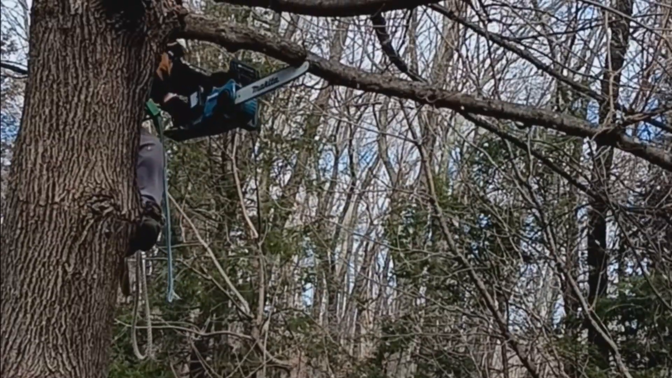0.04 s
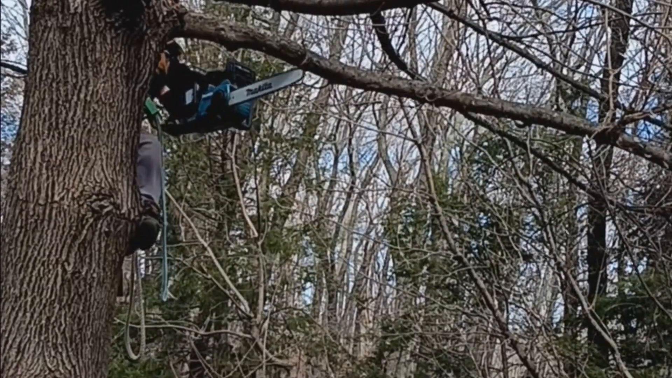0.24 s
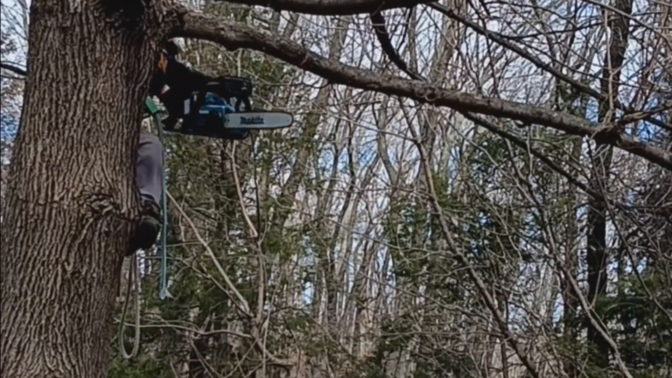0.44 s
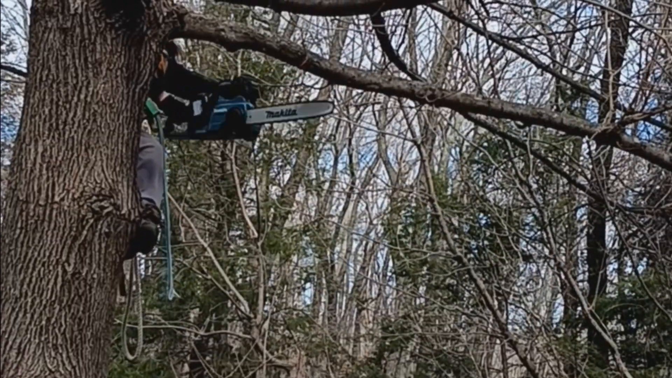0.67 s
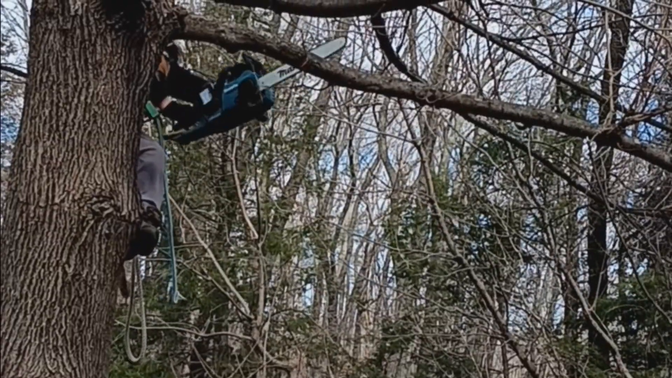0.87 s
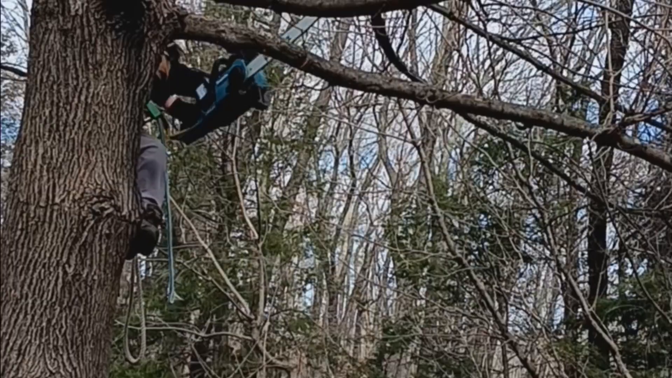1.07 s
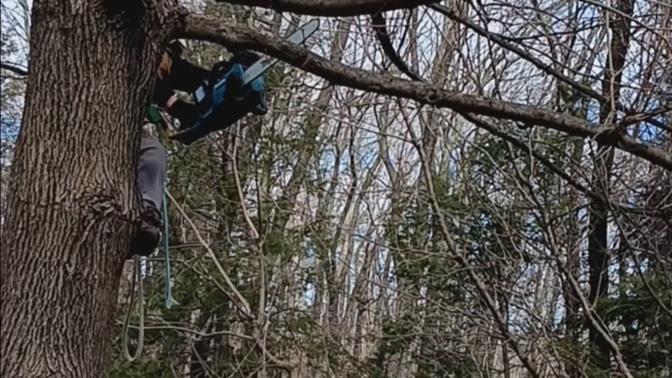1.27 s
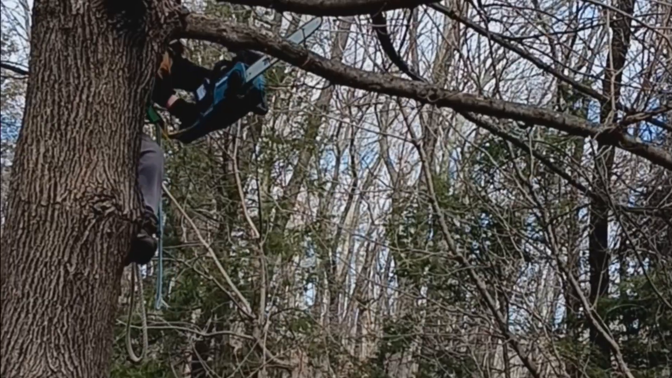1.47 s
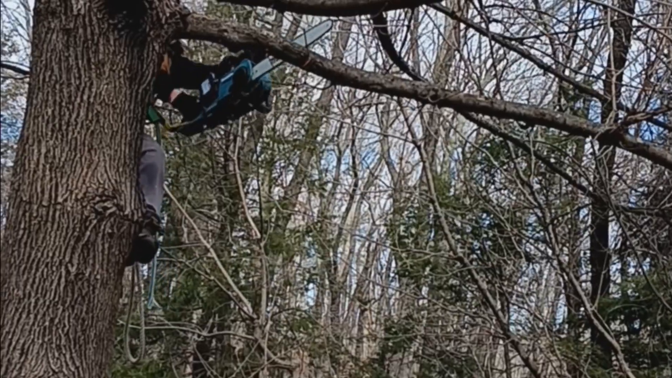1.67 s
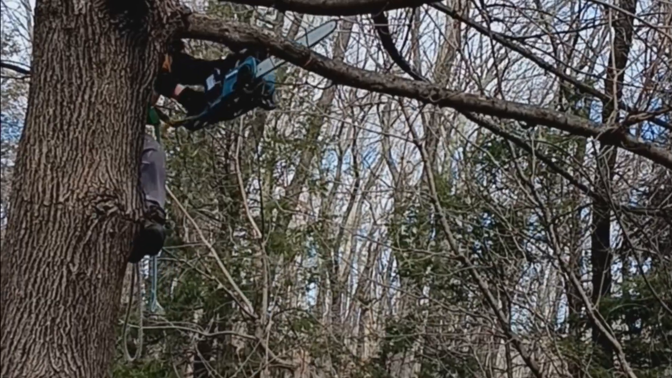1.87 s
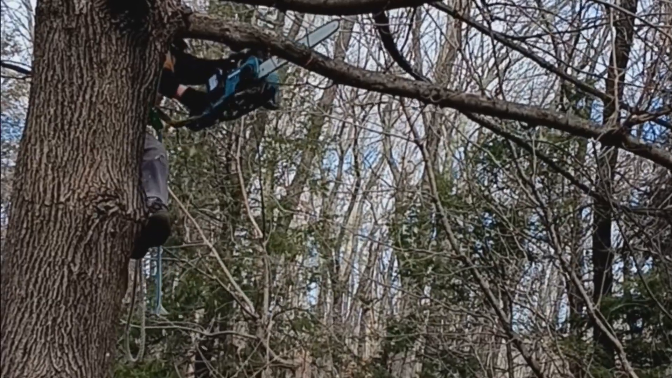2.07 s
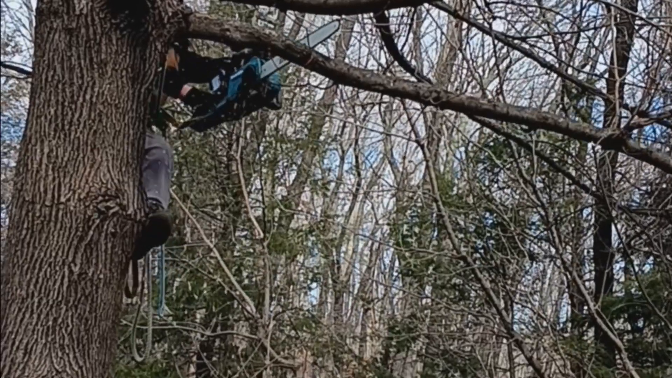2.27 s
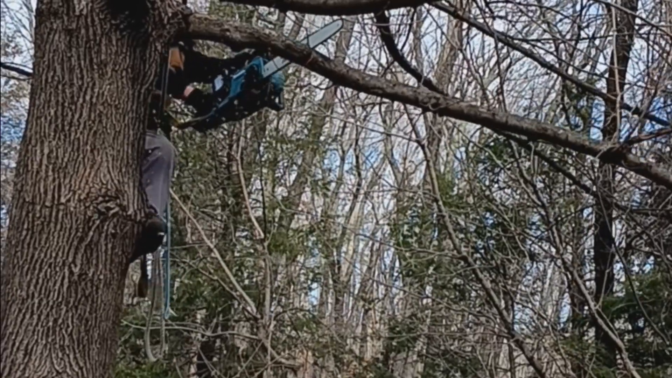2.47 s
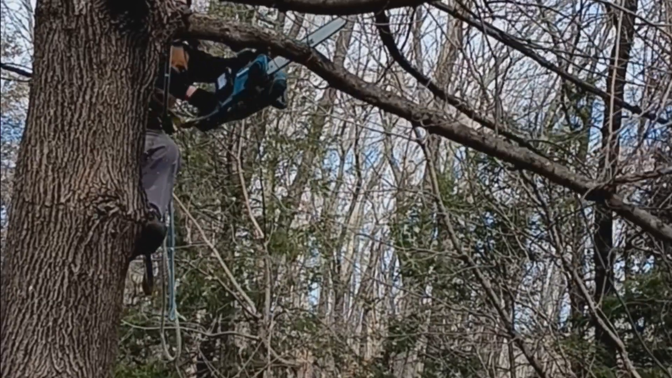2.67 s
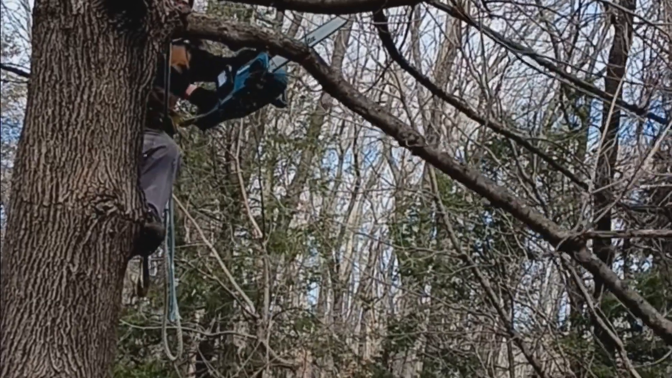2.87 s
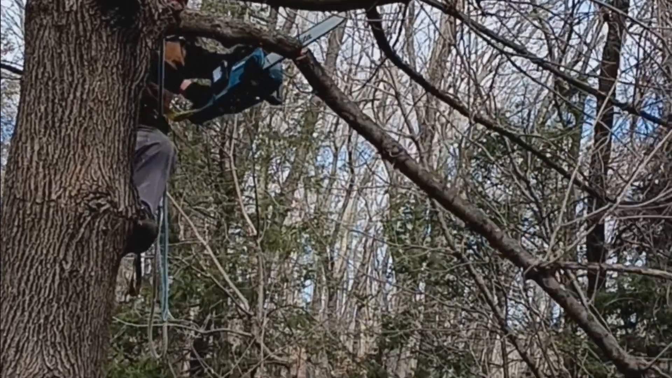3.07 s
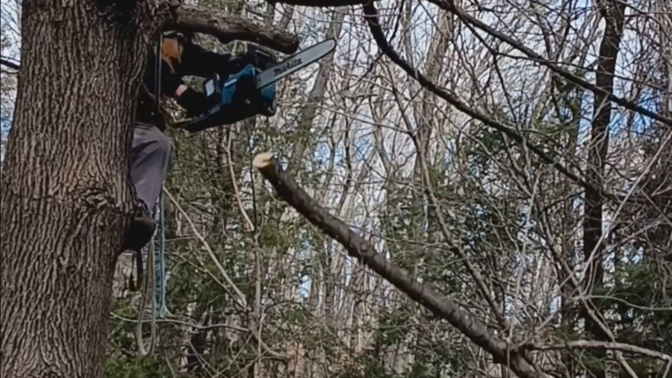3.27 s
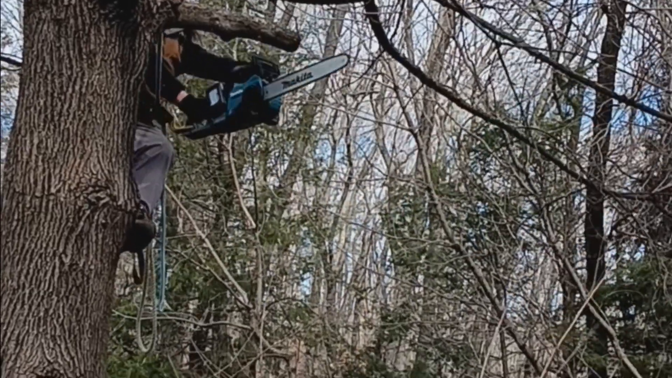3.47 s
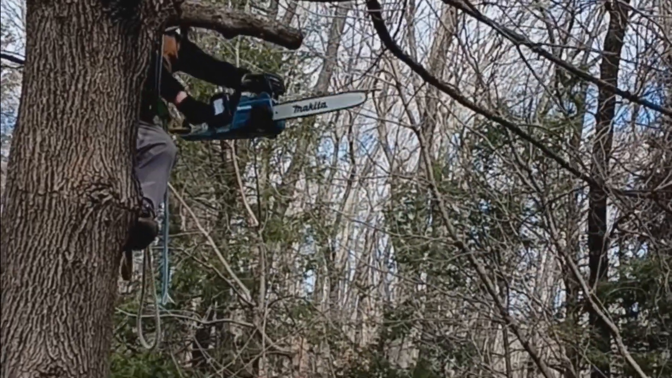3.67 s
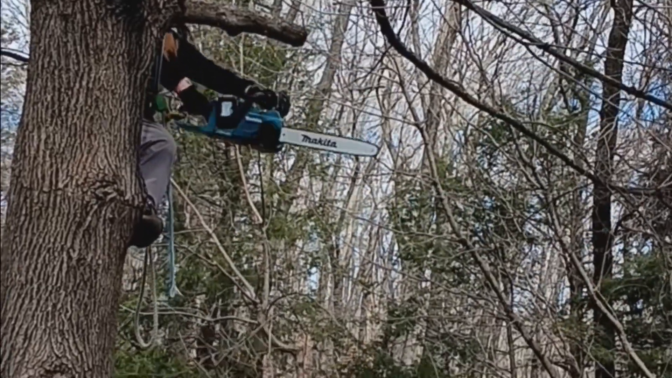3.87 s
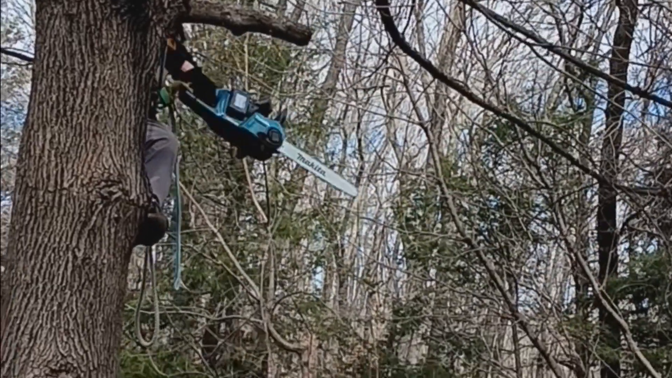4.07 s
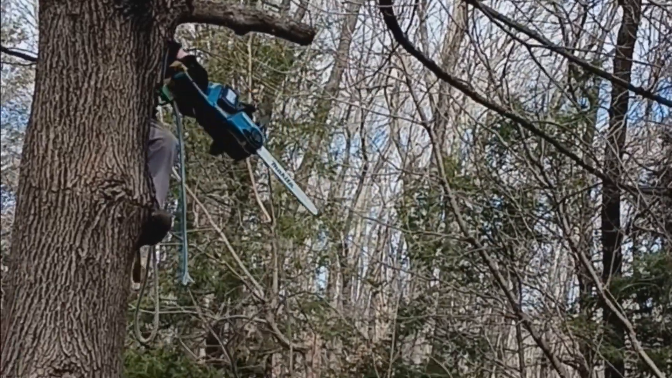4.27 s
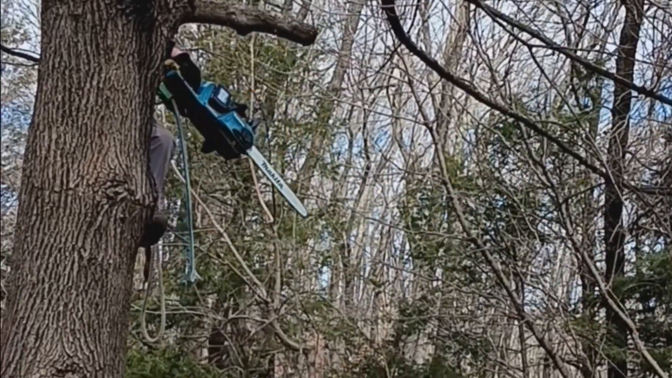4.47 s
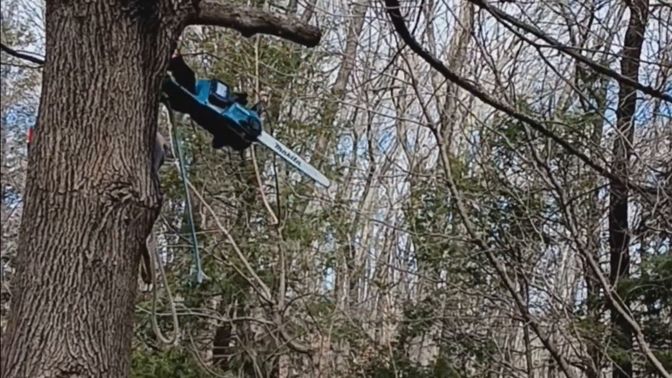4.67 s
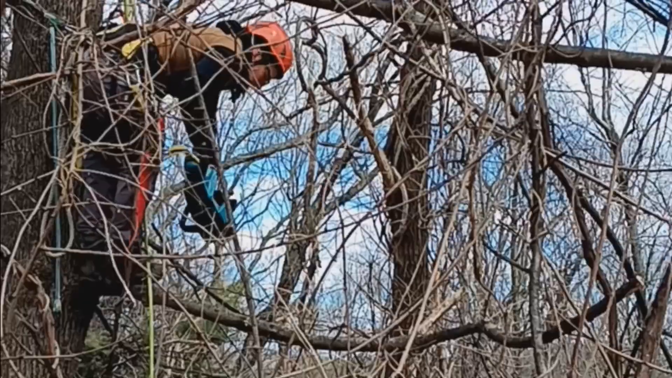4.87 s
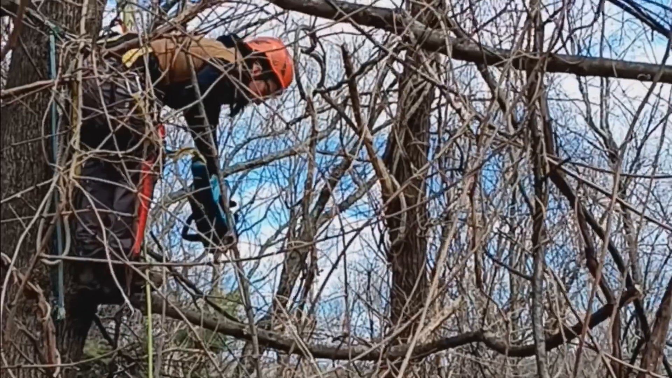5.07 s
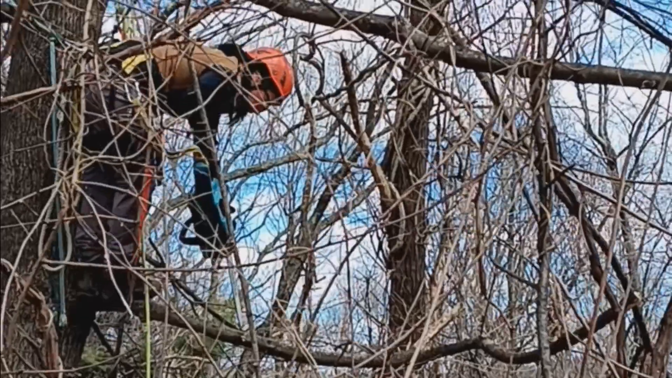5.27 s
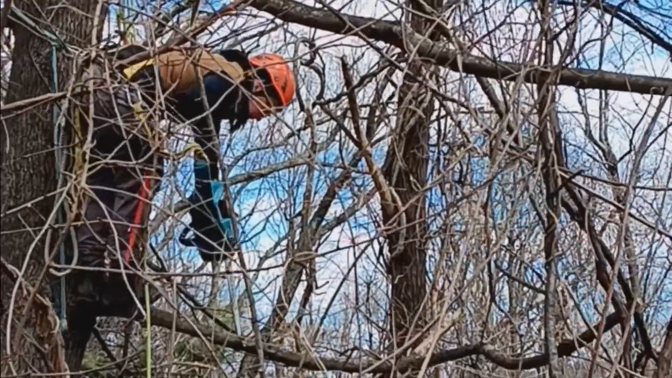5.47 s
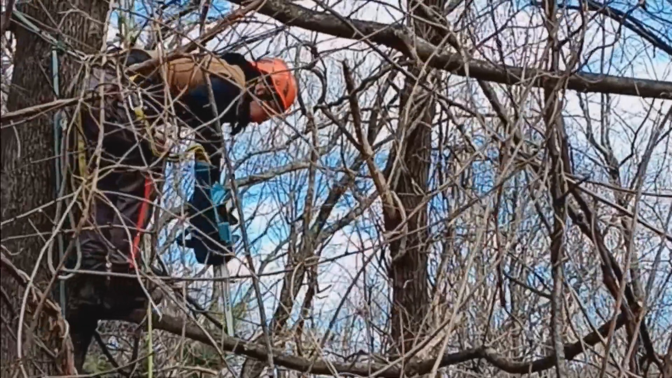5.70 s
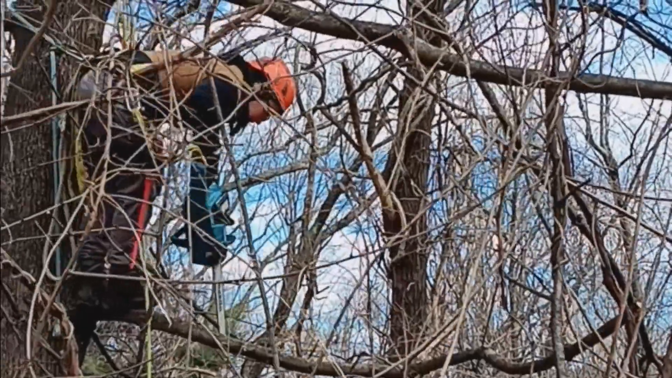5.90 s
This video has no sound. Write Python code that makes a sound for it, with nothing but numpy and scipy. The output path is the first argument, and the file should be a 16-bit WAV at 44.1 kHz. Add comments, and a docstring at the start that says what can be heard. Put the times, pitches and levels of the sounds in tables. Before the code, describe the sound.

A battery chainsaw whirs up and sags through a limb that cracks and sweeps down through twigs, then whines again in buffeting wind.

```python
"""A climber's battery chainsaw up in a tree: the end of one burst, then a cut in which the motor sags until the limb
cracks and sweeps down through the twigs. From a second, windier spot the saw spins up again and runs free.
Chain speed drives link-by-link rattle and sine whine; cutters rasp, twigs and gear are shaped noise, snaps and
clinks are short noise bursts, and wind buffets the two microphone ports separately."""
import sys
import numpy as np
from scipy import signal
from scipy.fft import rfft, irfft
from scipy.io import wavfile
from scipy.ndimage import uniform_filter1d

SR = 44100
rng = np.random.default_rng(int(sys.argv[2]) if len(sys.argv) > 2 else 0)


def waveform_to_disk(signal):
    """Save audio, clipped to [-1, 1], as 16-bit WAV at the path in sys.argv[1]."""
    frames = np.transpose(np.atleast_2d(signal))
    scaled = np.clip(frames, -1, 1) * 32767
    samples = np.round(scaled).astype(np.int16)
    wavfile.write(sys.argv[1], SR, samples)


N = 261954
T, HZ = np.arange(N) / SR, np.maximum(np.fft.rfftfreq(N, 1 / SR), 1)
SCENE_CHANGE_S = 4.768  # the microphone stands at the first spot before this, at the second after
TOP_HZ = 15750  # top of the recorder's band
FREE_HZ = 1068  # drive links per second that an unloaded chain approaches
LINKS_PER_TURN, LINKS_PER_LAP, POLE_PASSES_PER_LINK = 6, 52, 7

# The pulls of the trigger. Each row: pressed and released in seconds, chain level in dB,
# left minus right in dB, knee in links per second, power of speed that the rattle follows below the knee.
RUNS = [(-.525, .07, -20, -5, 350, 1.5), (1.26, 3.245, -19.3, -3.5, 450, 2.0),
        (4.884, 6, -18.8, 1.6, 830, 1.3)]


def undb(db):
    """Decibels to gain."""
    return 10 ** (np.asarray(db) / 20)


def curve(rows, column=1):
    """One column of a table of times, for every sample."""
    rows = np.array(rows)
    return np.interp(T, rows[:, 0], rows[:, column])


def swell(rows, fade=.02):
    """Gain of a level curve, dying away beyond its ends with a time constant of fade seconds."""
    outside = np.maximum(rows[0][0] - T, 0) + np.maximum(T - rows[-1][0], 0)
    return undb(curve(rows)) * np.exp(-outside / fade)


def pan(db):
    """Left and right gains of a level difference, at constant power."""
    gains = undb(np.array([db, -db]).reshape(2, -1) / 2)
    return gains / np.sqrt(np.mean(gains ** 2, axis=0))


def colour(points, column=1):
    """Gain per frequency through points, on a log axis."""
    points = np.array(points)
    return undb(np.interp(np.log(HZ), np.log(points[:, 0]), points[:, column]))


def shape(x, gain):
    """Filter that keeps the power of white noise."""
    return irfft(rfft(x) * gain / np.sqrt(np.mean(gain ** 2)), N)


def walk(rate, count=1):
    """Random wander with a spread near 1, through rate knots a second."""
    knots = rng.standard_normal((count, N // 8))
    return 1.2 * np.array([np.interp(T * rate, np.arange(N // 8), k) for k in knots])


def air(alike_hz=5000):
    """Noise at two ports: partly alike at low frequencies, scattered apart in the treble."""
    common, *own = rfft(rng.standard_normal((3, N)))
    share = 0.58 / (1 + (HZ / alike_hz) ** 2 / 2)
    return irfft(common * np.sqrt(share) + np.array(own) * np.sqrt(1 - share), N)


def band(x, hz, octaves):
    """A broad resonance about hz."""
    edges = np.clip([hz / 2 ** (octaves / 2), hz * 2 ** (octaves / 2)], 10, SR / 2 - 500)
    return signal.sosfilt(signal.butter(2, edges, "band", fs=SR, output="sos"), x)


def add(out, s, x):
    """Mix a short sound in at time s."""
    start = int(s * SR)
    out[:, start:start + x.shape[-1]] += x[:, :N - start]


def aside(x, lag):
    """A source to the right reaches the left port lag samples late."""
    return np.array([np.pad(x[0], (lag, 0))[:N], x[1]])


def chain_speed(pressed, released, load):
    """Links per second in one run: a creep, a wind-up that sags under load, a steady coast, the brake."""
    creep_s, spin_up_s, take_up_s, creep_hz = .067, .27, .008, 112
    coast_hz_per_s, brake_below_hz, brake_hz_per_s = 1480, 330, 3000
    sag = .34  # share of the speed lost at full load
    wind_up = FREE_HZ * np.tanh((T - pressed - creep_s) / spin_up_s) * (1 - sag * load)
    driven = np.maximum(wind_up, creep_hz) * np.clip((T - pressed) / take_up_s, 0, 1)
    coast = np.interp(released, T, driven) - coast_hz_per_s * (T - released)
    brake = brake_below_hz + (coast - brake_below_hz) * brake_hz_per_s / coast_hz_per_s
    return np.maximum(np.where(T < released, driven, np.minimum(coast, brake)), 0)


def chain_level(runs, speed, gaining, load):
    """Left and right gain of the chain: it grows with speed up to a knee, with load and with driving power."""
    load_db, surge_db, surge_hz_per_s = 1.56, 2.5, 1300
    crack_s, dip_db, dip_width_s = 2.505, -6, 0.052
    placed = 0
    for run, (_, _, db, side_db, knee_hz, power) in zip(runs, RUNS):
        placed = placed + (run > 0) * undb(db) * pan(side_db) / np.hypot(1, (knee_hz / speed) ** power)
    surge = np.clip(gaining / surge_hz_per_s * speed / FREE_HZ, 0, 1)
    # the level dips briefly as the limb cracks
    dip = dip_db * np.exp(-((T - crack_s) / dip_width_s) ** 2)
    return placed * undb(load_db * load + surge_db * surge + dip)


def chain(links, load, link_db=2.0, lap_db=.7, grain_db=2.1, steadied_db=1.1):
    """Links slap the bar, tight and slack stretches recur each lap; the level flutters most when running free."""
    pattern = rng.standard_normal(LINKS_PER_LAP)[links.astype(int) % LINKS_PER_LAP]
    slap = .5 + np.exp(-(links % 1) / 2.05)
    lap = np.sin(2 * np.pi * links / LINKS_PER_LAP)
    # load steadies the flutter
    flutter = (-1.53 + steadied_db * load) * walk(70)
    size = slap * undb(link_db * pattern + lap_db * lap + grain_db * walk(2500) + flutter)
    return air(alike_hz=5560) * size / np.std(size * rng.standard_normal(N))


def runout(links):
    """A slightly eccentric sprocket adds weak lines at the multiples of the shaft rate."""
    turns, out = links / LINKS_PER_TURN, 0
    for k in range(5, 27):
        if k % LINKS_PER_TURN:
            out = out + undb(rng.standard_normal()) * np.sin(2 * np.pi * (k * turns + rng.random()))
    return out


def whine(links, speed, load, damped_db=-4, rough_db=2.5):
    """Teeth mesh with the chain; each overtone swells as it glides through a resonance of the housing."""
    # Overtones of the sprocket. Each row: multiple of the link rate, relative level in dB.
    overtones = [(1, -0.5), (2, 3.5), (3, 0), (4, -0.5), (5, 0.5), (6, -1)]
    # How well the housing radiates the whine. Each row: frequency in Hz, gain at the first and second spot in dB.
    housing = [(340, -33, -20), (507, 1, 5), (710, -7, -6), (780, -5.5, -14), (883, -7, 2),
               (1330, 0.5, 0.5), (1600, -12.5, 1), (1730, 2, 4.5), (2110, -6, -8.5), (2300, -18, -9),
               (2800, -6, 6.5), (3020, 4, 3), (3080, 3, -4), (3600, -1.5, 4.5), (4200, -6, -17),
               (8000, -20, -22)]
    hz, first_db, second_db = np.transpose(housing)
    out = 0
    for k, (_, overtone_db) in enumerate(overtones, 1):
        first, second = (np.interp(np.log(k * speed), np.log(hz), db) for db in (first_db, second_db))
        # a slack or loaded chain meshes unevenly, which blurs the high overtones most
        flutter = np.sqrt(k) * (.2 + .2 * load + .3 * np.exp(-speed / 600)) * walk(130)
        db = overtone_db + np.where(T < SCENE_CHANGE_S, first, second) + damped_db * load + rough_db * walk(45)
        out = out + undb(db) * np.sin(2 * np.pi * k * links + flutter)
    return out


def body(spectrum, rings, ripple_db=4.0):
    """Bar and housing towards each port: a few strong resonances and a ripple of weak ones, merging in the treble."""
    rings = np.array(rings)
    bumps = np.exp(-np.log(2) * (2 * (HZ - rings[:, :1]) / rings[:, 1:2]) ** 2)
    ripple = np.interp(HZ, np.linspace(0, SR / 2, 400), rng.standard_normal(400))
    ripple = ripple / np.hypot(1, (HZ / 6000) ** 2)
    gain = np.array([colour(spectrum, column=1 + k) * undb(rings[:, 2 + k] @ bumps + ripple_db * ripple)
                     for k in range(2)])
    return gain / np.sqrt(np.mean(gain ** 2, axis=1, keepdims=True))


def clatter(speed):
    """A slow, slack chain clatters low in the housing until the brake holds it."""
    slack = np.exp(-((speed - 350) / 220) ** 2) * np.clip((speed - 25) / 15, 0, 1)
    return slack * undb(5.0 * walk(250)) * shape(air(), np.exp(-((HZ - 1600) / 550) ** 2))


def motor(links, speed, gaining):
    """The motor's poles sing a rising chirp while it pulls the chain up to speed."""
    pull = np.clip(gaining / 3000, 0, 1)
    poles = np.sin(2 * np.pi * POLE_PASSES_PER_LINK * links + .5 * walk(300))
    singing = np.exp(-((speed - 300) / 145) ** 6) * np.exp(-(speed - 200) / 260)
    return pull * singing * poles * undb(1.8 * walk(120)) * pan(11)


def rasp(load):
    """Cutters tear out chips in uneven bites, louder with load."""
    # The sound of tearing wood. Each row: frequency in Hz, relative level in dB.
    tearing = [(120, 3), (200, 11), (350, 7), (600, 7), (1000, 20), (1700, -52), (2400, -13), (3600, -28),
               (7000, 22.5), (15000, -16)]
    bites = undb(4 * walk(400) + 1.2 * walk(25))
    return bites * np.sqrt(load) * shape(air(), colour(tearing))


def saw(whine_db=-12, free_db=-2, shaft_db=-29, rasp_db=-29, motor_db=-25.5, motor_second_db=-26, slow_db=-36):
    """Chain speed and load drive rattle, whine, rasp, clatter and the motor's chirp."""
    # How hard the cutters bite into the limb. Each row: time in seconds, load from 0 to 1.
    bite = [(1.38, 0), (1.5, .35), (1.6, .44), (1.76, .71), (1.95, .97), (2.2, 1), (2.4, .86), (2.55, .58),
            (2.72, .41), (3.01, .44), (3.2, .12), (3.5, 0)]
    # The saw as it radiates to each spot. Each row: frequency in Hz, relative left and right level in dB.
    radiated_first = [(152, -76, -80), (443, -15, -17), (790, -16, -23.5), (1324, -10.5, -10.5),
                      (2340, -16.5, -20.5), (4210, -4.5, -6), (5740, -8, -7), (5580, -4, -5.5),
                      (7680, -2.5, -3), (8760, 0, 2.5), (10300, -6.5, -1), (11600, -21, -6.5),
                      (13000, -8.5, -10), (16200, -43, -8)]
    radiated_second = [(150, -10.5, -35), (750, -33, -30), (875, -42, -9), (1250, -23.5, -17.5),
                       (1780, -20, -13.5), (2263, -19.5, -18), (4400, -14.5, -9.5), (5030, -21, -8),
                       (6900, -11, -6), (9400, -11, 0.5), (11300, -17.5, -8.5), (15700, -25.5, -14)]
    # Resonances of bar and housing. Each row: centre in Hz, width in Hz, left and right boost in dB.
    rings_first = [(1879, 376, 16.5, 4), (3090, 730, 8, 9.5), (5900, 150, 9, 3), (7800, 195, 13.5, -12),
                   (8400, 400, 5, 2.5)]
    rings_second = [(3250, 340, 2.3, 6), (7810, 110, 12, 1.8), (8300, 590, 5.4, 2)]
    at_first = T < SCENE_CHANGE_S
    load = curve(bite)
    runs = [chain_speed(pressed, released, load) for pressed, released, *_ in RUNS]
    speed = np.maximum(sum(runs), 1)
    gaining = uniform_filter1d(np.gradient(speed) * SR, size=800)  # links per second, per second
    # the link rate jitters, more under load
    links = np.cumsum(speed * (1 + (.0015 + .005 * load) * walk(40)[0])) / SR
    level = chain_level(runs, speed, gaining, load)
    drive = chain(links, load) + undb(shaft_db) * (1 - load) * runout(links)
    sprocket = undb(whine_db) * pan(8.8) * whine(links, speed, load)
    first = undb(3.0) * shape(drive, body(radiated_first, rings_first)) + sprocket
    second = undb(4.0) * shape(drive, body(radiated_second, rings_second)) + undb(free_db) * sprocket
    out = level * np.where(at_first, first, second) + undb(rasp_db) * rasp(load)
    out = out + undb(np.where(at_first, motor_db, motor_second_db)) * motor(links, speed, gaining)
    return out + undb(slow_db) * clatter(speed)


def forest(x, t60=0.38, echo_db=-21):
    """Trunks scatter back a faint, dull tail."""
    tail = rng.standard_normal((2, N)) * undb(-60 * T / t60) * (T > .02)
    tail = shape(tail, 1 / np.hypot(1, HZ / 3500))
    return undb(echo_db) * signal.fftconvolve(x, tail / np.sqrt(np.sum(tail ** 2) / 2), axes=1)[:, :N]


def wind(rumble_db=0, buffet_db=-4, eddy_db=-1):
    """Each port has its own turbulence: deep rumble, gusty buffeting and strong single eddies."""
    # Wind on the ports. Each row: time in seconds, relative level in dB, left minus right in dB before widening.
    gusts = [(0, -42, -11), (.2, -49.5, 1), (.38, -33, -24), (1.15, -39.5, -28), (1.5, -31, -8),
             (1.63, -44.5, -3), (1.85, -37, 3), (2.1, -47, 4), (2.47, -27.5, -9), (2.62, -46, 6),
             (3.2, -54.5, 3), (3.5, -33, 8), (4.1, -29.5, 1), (4.75, -31.5, 2), (4.785, -20.5, 3),
             (5.1, -19.5, 11.5), (5.35, -23.5, -3), (5.94, -23.5, 13)]
    # Colours of the deep rumble and of the buffeting. Each row: frequency in Hz, relative level in dB.
    rumble_colour = [(20, -16), (45, 3.5), (90, 0.5), (150, -7), (250, -29), (500, -94), (1000, -97),
                     (4000, -100)]
    buffet_colour = [(40, -2), (130, 5), (250, -1), (450, -16.5), (900, -32.5), (2500, -53), (8000, -84)]
    # Eddies striking the ports. Each row: start in seconds, relative peak in dB, pitch in Hz, left minus right in dB.
    eddies = [(.553, -23, 228, -19), (0.699, -17.5, 71, -32), (4.122, -18.5, 77, -7), (4.377, -12, 74, 26),
              (4.391, -17, 170, 24), (4.769, -11, 300, 29), (4.8, -6, 137, 15), (4.821, -10, 560, 30),
              (4.964, -14, 415, 35), (4.994, -4.5, 169, 25), (5.02, -1.5, 98, 28), (5.138, -8.5, 297, 23),
              (5.267, -10.5, 151, 22), (5.3, -7, 190, -24), (5.368, -7.5, 232, -28)]
    db = curve(gusts)
    # the deepest rumble grows less than the buffeting in a hard gust
    rumble_level = undb(rumble_db + db - 0.41 * np.maximum(db + 25.0, 0) + 2 * walk(22, count=2))
    rumble = rumble_level * shape(rng.standard_normal((2, N)), colour(rumble_colour))
    flurry_db = 9.74 * np.minimum(walk(45, count=2), 1.5)
    buffet_level = undb(buffet_db + db + 1.08 * np.minimum(db + 18.5, 0) + flurry_db)
    buffet = buffet_level * shape(rng.standard_normal((2, N)), colour(buffet_colour))
    out = (rumble + buffet) * pan(1.1 * curve(gusts, column=2))
    for s, peak_db, hz, side_db in eddies:
        cycles = T[:4096] * hz
        puff = (np.exp(1 - cycles / .5) * cycles / .5) ** 2  # strongest after half a cycle
        add(out, s, undb(peak_db + eddy_db) * pan(side_db) * np.sin(2 * np.pi * cycles) * puff)
    return out


def woods():
    """Still woods: a steady, faint bed of coloured noise, separate at each port."""
    # The quiet bed. Each row: frequency in Hz, relative level in dB.
    bed = [(100, 27.5), (400, -4), (1500, -3), (2500, -6.5), (6000, 14.5), (15000, 2.5)]
    return undb(-51.5) * shape(rng.standard_normal((2, N)), colour(bed))


def rustle(levels, spectrum, db, grain_db, clump_db):
    """Countless tiny scrapes as noise in overlapping bands, each flickering alone, all swelling in clumps."""
    source, out = rfft(air(alike_hz=3000)), 0
    step = 1500  # band spacing, Hz
    for hz in np.arange(0, TOP_HZ + step, step):
        part = irfft(source * np.sqrt(np.maximum(1 - abs(HZ - hz) / step, 0)), N)
        out = out + part * undb(grain_db * walk(260))
    out = out * undb(clump_db * walk(77))
    return undb(db) * swell(levels, fade=0.028) * shape(out / np.std(out), colour(spectrum))


def cloth():
    """Clothes and harness rustle close by while the saw rests."""
    # The climber shifting. Each row: time in seconds, relative level in dB.
    shift = [(0.64, -48), (0.706, -52.5), (0.848, -52), (0.988, -57), (1.178, -62), (1.26, -55)]
    # Colour of the fabric. Each row: frequency in Hz, relative level in dB.
    fabric = [(350, -101), (600, -30), (1780, -17), (2340, -50), (4090, -8), (5150, -17), (6230, -13),
              (6490, 1.5), (9500, 0), (15500, -43)]
    return rustle(shift, fabric, db=6.5, grain_db=7, clump_db=1)


def burst(hz, t60, octaves, count=8192):
    """A dying spray of tiny fractures or contacts through one resonance; peak near 1."""
    t = T[:count]
    common, *own = rng.standard_normal((3, count))
    x = band((common + 2.8 * np.array(own)) * undb(-60 * t / t60), hz, octaves)
    return x / (3 * np.sqrt(np.mean(x[:, :256] ** 2)))


def clinks(trim_db=1, t60=0.021):
    """Metal of gear and saw clinks brightly, in narrow bursts."""
    # The clinks. Each row: start in seconds, relative peak in dB, ring in Hz, left minus right in dB.
    contacts = [(.659, -26.5, 8000, -8), (.694, -28.5, 6600, 7), (.735, -27.5, 7000, 12),
                (.887, -27, 6300, 16), (0.899, -30, 5960, 12), (.938, -30, 6940, 19),
                (.989, -29.5, 6800, 20), (1.041, -35, 9100, -9), (1.183, -31, 7060, 10),
                (1.235, -22.5, 6950, 13), (1.26, -24, 8000, -13), (4.766, -28, 3870, 18),
                (4.783, -19, 7660, 19), (4.885, -30, 7540, 20), (4.933, -26, 7200, 19)]
    out = np.zeros((2, N))
    for s, db, hz, side_db in contacts:
        add(out, s, undb(db + trim_db) * pan(side_db) * burst(hz, t60, octaves=0.65))
    return out


def snaps(trim_db=2):
    """Limb fibres and twigs snap, in broad bursts."""
    # The snaps. Each row: start in seconds, relative peak in dB, centre in Hz, time to fall 60 dB in seconds.
    breaks = [(2.474, -16.5, 397, 0.025), (2.478, -11, 1550, 0.029), (2.483, -12.5, 2570, 0.069),
              (2.705, -21.5, 695, 0.045), (2.81, -19, 1026, 0.062), (2.929, -23.5, 496, 0.04),
              (2.995, -16.5, 1040, .04), (3.63, -12, 7010, .051), (3.654, -7.5, 6360, 0.031),
              (3.719, -12, 4630, 0.035), (3.725, -8, 4600, .06), (3.776, -14.5, 2750, 0.11),
              (3.88, -16.5, 1630, 0.056), (3.918, -8.5, 6200, 0.022), (4.422, -18, 6700, 0.19),
              (4.425, -28, 1300, 0.059), (4.5, -15, 6700, 0.086), (4.502, -31, 1520, .06),
              (4.561, -26, 6650, 0.31), (4.618, -25.5, 5030, .068), (4.655, -34, 850, 0.024)]
    out = np.zeros((2, N))
    for s, db, hz, t60 in breaks:
        add(out, s, undb(db + trim_db) * burst(hz, t60, octaves=1.48))
    return out


def leaves():
    """Twigs and leaves brushed by the falling limb."""
    # The limb's way down. Each row: time in seconds, relative level in dB.
    sweep = [(3.6, -32), (3.76, -23.5), (4.09, -35.5), (4.482, -42), (4.674, -42.5), (4.76, -45)]
    # Colour of the foliage. Each row: frequency in Hz, relative level in dB.
    foliage = [(350, -34), (600, -17), (855, -14.5), (1080, -13.5), (1300, -3), (1780, -3), (2310, -10),
               (3070, -3), (5590, -0.5), (6490, 3), (8630, 5.5), (15500, -12.5)]
    onset = np.clip((T - 3.6) / 0.16, 0, 1)
    return rustle(sweep, foliage, db=5.5, grain_db=3.3, clump_db=.8) * onset


def scene():
    """Saw, climber and falling limb, heard from one spot and then the other, in wind and woods."""
    near = saw() + cloth() + clinks() + snaps()
    at_first = T < SCENE_CHANGE_S
    # lags of the left port in samples
    first = at_first * (aside(near, 48) + aside(leaves(), 30))
    second = ~at_first * aside(near, 40)
    # the first spot's echo stops where the scene changes
    echoes = at_first * forest(first) + forest(second)
    return first + second + echoes + wind() + woods()


def record(dry):
    """The recorder clips at full scale and cuts the top."""
    top_cut = signal.ellip(10, .2, 70, TOP_HZ, fs=SR, output="sos")
    return signal.sosfilt(top_cut, np.clip(dry, -1, 1))


dry = scene()
out = record(dry)
waveform_to_disk(out)
```